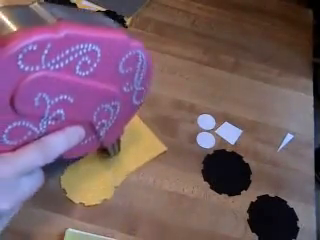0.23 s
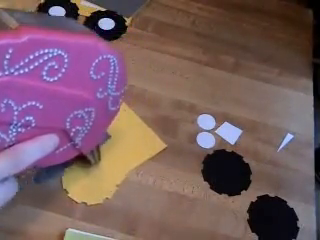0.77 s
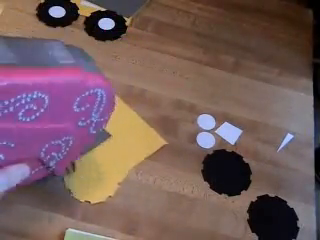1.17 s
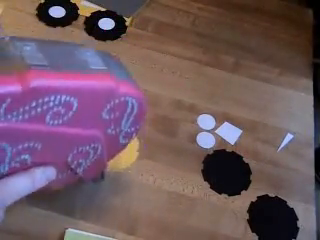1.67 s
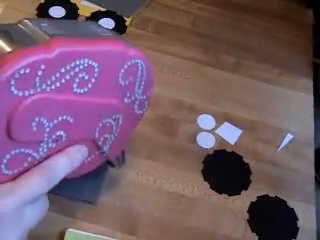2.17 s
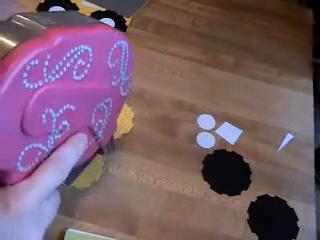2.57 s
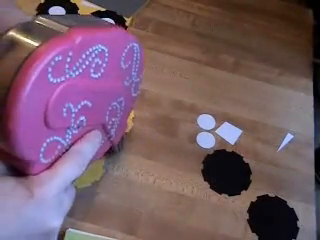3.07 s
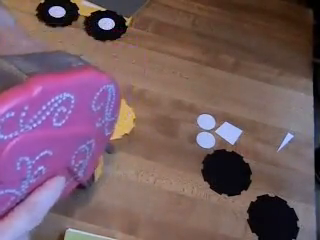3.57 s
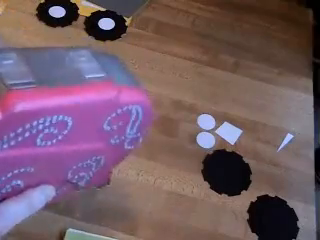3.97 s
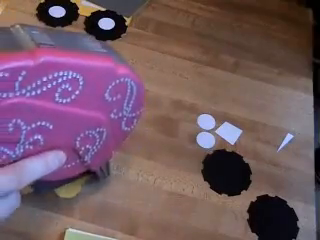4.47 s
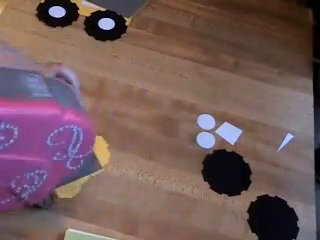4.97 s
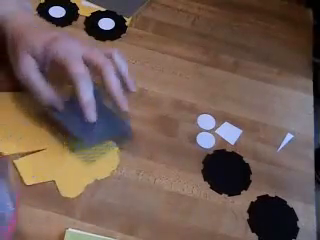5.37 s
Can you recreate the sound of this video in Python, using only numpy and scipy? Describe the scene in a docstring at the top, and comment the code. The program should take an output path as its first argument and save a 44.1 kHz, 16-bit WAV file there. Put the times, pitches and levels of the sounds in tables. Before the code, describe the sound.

A plastic tape runner clacks and rattles as it is pressed and dragged across cardstock on a wooden table.

```python
"""A big plastic tape runner, close to the microphone, on cardstock on a wooden table in a small room.
It is set on the card, dragged along it three times, then put down. Its hollow shell clacks at each
press and lift, and the reel gears rattle through it while it rolls. Sticky tape crackles as it parts,
the card slides, the table thuds under heavy presses. A faint mains hum lies behind it all."""
import sys
import numpy as np
from scipy import signal
from scipy.fft import rfft, irfft
from scipy.io import wavfile
from scipy.ndimage import uniform_filter1d

SR = 44100
rng = np.random.default_rng(int(sys.argv[2]) if len(sys.argv) > 2 else 0)


def write(x):
    x = np.atleast_2d(x).T
    wavfile.write(sys.argv[1], SR, np.round(np.clip(x, -1, 1) * 32767).astype(np.int16))


N = 247205
T = np.arange(N) / SR
FREQ = np.maximum(np.fft.rfftfreq(2 * N, 1 / SR), 1)
# Tone of the runner's growl, rolling or skidding. Each row: frequency in Hz, gain in dB.
GROWL_COLOUR = [(120, 2.5), (300, 3), (440, -7.5), (650, 0.5), (920, 2), (1500, 4), (2300, -8),
                (3200, -17.5), (6000, -42)]


def undb(db):
    """Decibels to gain."""
    return 10 ** (np.asarray(db) / 20)


def unit(x):
    """Scale to rms 1."""
    return x / np.sqrt(np.mean(x ** 2))


def fade(t, t60):
    """Exponential decay, 60 dB down after t60 seconds."""
    return np.exp(-np.log(1000) * t / t60)


def add(out, start_s, sound):
    """Mix a sound in at start_s."""
    i = int(start_s * SR)
    out[i:i + len(sound)] += sound[:N - i]


def colour(x, points):
    """Shape a sound by (Hz, dB) points."""
    hz, db = np.transpose(points)
    gain = undb(np.interp(np.log(FREQ), np.log(hz), db))
    return irfft(rfft(x, 2 * N) * gain)[:N]


def band(x, lo_hz, hi_hz, order=3):
    """Causal band-pass."""
    return signal.sosfilt(signal.butter(order, [lo_hz, hi_hz], 'band', fs=SR, output='sos'), x)


def wander(rate_hz):
    """Smooth random drift of rms 1."""
    hold = int(SR / rate_hz)
    steps = np.repeat(rng.standard_normal(N // hold + 2), hold)
    return unit(uniform_filter1d(steps, hold)[:N])


def grains(per_s, spread_db):
    """Random tiny snaps of uneven size."""
    snaps = (rng.random(N) < per_s / SR) * rng.choice([-1, 1], N)
    return unit(snaps * undb(spread_db * np.clip(rng.standard_normal(N), -2, 2)))


def swells(rows):
    """Gain that rises and falls exponentially around each peak."""
    return sum(undb(db) * np.exp(np.minimum((T - peak) / rise, (peak - T) / fall))
               for peak, rise, fall, db in rows)


def pushes(rows, edge_s, roundness=1.3):
    """A hand's effort: it takes hold within edge_s, grows to a peak, eases and lets go."""
    gain = np.zeros(N)
    for start, peak, end, db, sag_db in rows:
        from_peak = np.interp(T, [start, peak, end], [1, 0, 1])
        gain += undb(db - sag_db * from_peak ** roundness) * ((T > start) & (T < end))
    return np.abs(uniform_filter1d(gain, int(edge_s * SR)))


def room_tone(air_db=-46.6, waver_hz=0.61):
    """The room at rest: a wavering mains hum over a soft rush of air."""
    # Tones of the hum. Each row: frequency in Hz, rms level in dB.
    hum_tones = [(75.4, -66), (118.4, -51.5), (183.0, -57.5)]
    # Tone of the air. Each row: frequency in Hz, gain in dB.
    air_colour = [(15, -56), (25, -12), (122, -7), (148, -14), (188, 1.5), (228, -12.5), (270, -11.5),
                  (426, -15.5), (504, -21.5), (555, -13.5), (796, -17.5), (1890, -20.5), (2080, -23),
                  (5570, -32), (7800, -35), (10100, -51.5), (17200, -120)]
    hum = np.zeros(N)
    for hz, db in hum_tones:
        amplitude = np.sqrt(2) * undb(db + 0.31 * wander(6.6))
        cycles = np.cumsum(hz + waver_hz * wander(10)) / SR
        hum += amplitude * np.sin(2 * np.pi * cycles)
    drift = undb(.7 * wander(4.2))
    air = unit(colour(rng.standard_normal(N), air_colour))
    return hum + air * undb(air_db) * drift


def shell(x, direct):
    """The hollow case adds its resonances to the direct sound."""
    # Resonances of the case. Each row: frequency in Hz, width in Hz, gain in dB.
    resonances = [(409.3, 29, 1), (533.4, 11.7, 9), (572, 6.8, -0.5), (664.8, 38.4, 13), (723.3, 40, 9),
                  (866, 11, -2), (1023.5, 49, -6), (1272, 117, -5), (1482, 76, -10.5), (1630, 190, -10.5),
                  (1860, 210, -7.5), (2400, 720, -2), (2848, 300, -2.5), (4430, 2200, -7),
                  (5740, 40, -29.5)]
    return direct * x + sum(undb(db) * signal.lfilter(*signal.iirpeak(hz, hz / width, fs=SR), x)
                            for hz, width, db in resonances)


def clacks(snap=7, build_s=0.001304, crack_t60=0.047, tail_t60=0.25, tail_db=-17.0, contact_slope=6.25):
    """Each blow snaps the shell and its plastic parts chatter; a soft contact dulls the high ranges."""
    # Blows on the shell. Each row: start in seconds, level in dB, contact corner in Hz
    # (high for a hard edge, low for a blow padded by card).
    blows = [(0.036, -41.5, 3000), (0.0745, -28, 1100), (0.5998, -17, 1830), (0.714, -28.5, 2200),
             (0.7367, -25.5, 1790), (0.8066, -20.5, 2250), (0.831, -22, 1195), (0.9177, -21.5, 1260),
             (0.9904, -23.5, 1780), (1.046, -18.5, 1660), (1.1379, -33.5, 2400), (1.2482, -19.5, 2670),
             (1.2735, -20.5, 2000), (1.3009, -32.5, 4860), (1.3222, -33, 3420), (1.3478, -29, 3450),
             (1.3637, -34, 5500), (1.475, -27.5, 3370), (1.5042, -25, 2000), (1.7489, -32, 3530),
             (2.3348, -23.5, 2120), (2.761, -47.5, 4900), (3.0873, -21, 2254), (3.1318, -29.5, 1300),
             (3.175, -25.5, 3320), (3.2354, -24, 2400), (3.3662, -32.5, 1560), (3.4008, -38.5, 2600),
             (3.431, -32.5, 1870), (3.4453, -23.5, 2470), (3.481, -29.5, 2000), (3.675, -30.5, 1820),
             (3.819, -25, 2780), (3.8374, -33.5, 2000), (3.8627, -44, 4000), (3.925, -37, 4200),
             (3.9553, -24, 3600), (4.081, -21.5, 1850), (4.6614, -14, 1440), (4.6823, -18.5, 2070),
             (4.923, -29.5, 3070), (5.052, -35.5, 1710), (5.1043, -23.5, 2503), (5.2189, -29, 4000),
             (5.5792, -4, 2160)]
    # Ranges in which the shell answers, from thump to edge tick.
    # Each row: lower and upper edge in Hz, gain in dB, relative ring time.
    ranges = [(60, 303, -20.5, 1.8), (416, 896, -9, 0.82), (894, 1816, -8, 1.08), (2000, 4150, -2.5, 0.82),
              (4000, 8500, 8, 0.66)]
    out, t = np.zeros(N), T[:SR // 4]
    since_peak = np.maximum(t - build_s, 0)
    tail = undb(tail_db) * fade(since_peak, tail_t60)
    for start, db, corner_hz in blows:
        chatter = rng.standard_normal(len(t)) * np.minimum(t / build_s, 1)
        for lo_hz, hi_hz, range_db, hold in ranges:
            push = chatter * (fade(since_peak, crack_t60 * hold) + tail)
            push[int(build_s * SR)] += snap  # the parts seat home as the push peaks
            ring = band(shell(push, direct=0.21), lo_hz, hi_hz)
            ring /= np.std(ring[:SR // 60])  # the attack sets the level
            centre_hz = np.sqrt(lo_hz * hi_hz)
            contact = 1 / np.sqrt(1 + (centre_hz / corner_hz) ** contact_slope)
            add(out, start, ring * contact * undb(db + range_db))
    return out


def reel(tooth_hz=85, catch_decay_teeth=0.35, tick_db=-13.5, tick_growth=0.29):
    """Gear teeth catch unevenly, faster and brighter when pushed; each sprays snaps into the shell."""
    # Three drags and one brief nudge of the reel.
    # Each row: start, hardest moment and end in seconds, level in dB, sag at both ends in dB.
    strokes = [(0.7, 0.96, 1.203, -31, 13.5), (3.44, 3.62, 3.755, -31, 9), (4.2, 4.222, 4.255, -35, 15),
               (4.76, 4.94, 5.06, -24.5, 15)]
    force = pushes(strokes, edge_s=.02)
    effort = force / force.max()
    unevenness = np.exp(.35 * wander(60))
    teeth_passed = np.cumsum(tooth_hz * (.5 + 0.49 * np.sqrt(effort)) * unevenness) / SR
    kick = rng.random(N // 100)[teeth_passed.astype(int)] ** 2  # a few teeth catch much harder
    catch = 1 + 2.0 * kick * np.exp(-(teeth_passed % 1) / catch_decay_teeth)  # steady rub plus kicks
    rattle = shell(grains(7000, spread_db=3) * catch, direct=0.34)
    growl = unit(colour(rattle, GROWL_COLOUR))
    ticks = unit(band(rattle, 2690, 7430, order=2)) * undb(tick_db) * effort ** tick_growth
    return force * (growl + ticks)


def pings(t60=0.04, upper_ratio=1.069):
    """On some clacks the guide and pawl ring briefly in a close pair of modes."""
    # Rings of the small plastic parts. Each row: start in seconds, lower mode in Hz, level in dB.
    rings = [(0.738, 2430, -22), (0.808, 1655, -15), (1.136, 4050, -29.5), (1.138, 1744, -26.5),
             (2.337, 1810, -21.5), (3.131, 2400, -32.5), (3.237, 1830, -24.5), (3.446, 2425, -21.5),
             (5.106, 2110, -24.5)]
    out, t = np.zeros(N), T[:SR // 8]
    for start, hz, db in rings:
        lower = np.sin(2 * np.pi * hz * t)
        upper = .5 * np.sin(2 * np.pi * hz * upper_ratio * t + rng.uniform(0, 2 * np.pi))
        add(out, start, undb(db) * (lower + upper) * fade(t, t60))
    return out


def skids():
    """The tip sticks and slips as it bites or lets go, and croaks through the shell."""
    # Skids of the tip. Each row: peak time, rise and fall in seconds, level in dB.
    tip_skids = [(0.809, 0.0081, 0.0018, -25.5), (0.921, 0.004, 0.0064, -25),
                 (1.276, 0.0029, 0.0035, -24.5), (3.091, 0.0042, 0.0036, -14), (3.449, 0.011, 0.019, -28.5),
                 (4.686, 0.0071, 0.001, -27)]
    croak = shell(grains(7300, spread_db=2), direct=0.17)
    return swells(tip_skids) * unit(colour(croak, GROWL_COLOUR))


def tape(snaps_per_s=2500):
    """Threads of glue stretch and snap in a short bright crackle."""
    # Tape parting from the card. Each row: peak time, rise and fall in seconds, level in dB.
    peels = [(1.355, 0.011, 0.012, -22), (3.955, 0.012, 0.01, -23.5), (3.99, 0.0054, 0.0068, -30.5),
             (5.189, 0.014, 0.043, -31), (5.22, 0.014, 0.0038, -31)]
    # Tone of the crackle. Each row: frequency in Hz, gain in dB.
    peel_colour = [(200, -5.5), (700, -1), (1600, -2), (3000, -3), (5500, -2.5), (7500, -7.5)]
    crackle = grains(snaps_per_s, spread_db=6) + .6 * rng.standard_normal(N)
    return swells(peels) * unit(colour(crackle, peel_colour))


def card(gain_db=2.5):
    """Paper fibres catch and slip in a soft, dry hiss."""
    # Card sliding under tool and fingers. Each row: start, turning point and end in seconds,
    # relative level in dB, sag at both ends in dB (negative makes the ends louder).
    slides = [(1.37, 1.48, 1.69, -46.5, 12.5), (1.77, 1.88, 1.99, -46, 3.5), (2.1, 2.22, 2.287, -47, 12),
              (2.36, 2.44, 2.57, -48, 36), (2.55, 2.61, 2.7, -55.5, -7), (3.17, 3.185, 3.3, -55, 9),
              (3.97, 4.14, 4.22, -46, 12), (5.23, 5.35, 5.62, -45, 25)]
    # Tone of the hiss. Each row: frequency in Hz, gain in dB.
    card_colour = [(200, -18), (600, 0), (1000, -3.5), (1700, -2), (2800, -2), (5000, 0.5), (7500, -3)]
    fibres = grains(9000, spread_db=4) * undb(.8 * wander(70))
    return unit(colour(fibres, card_colour)) * pushes(slides, edge_s=0.038) * undb(gain_db)


def table_thuds(detune=0.021):
    """The table top answers heavy presses with a dull thud; broad pushes also move its lowest mode."""
    # Presses that rock the top. Each row: start in seconds, level in dB, lowest mode's extra gain in dB.
    presses = [(1.478, -40.5, -11), (1.753, -28.5, -24), (3.08, -32, 16.5), (3.177, -35, -18),
               (3.455, -29.5, -22), (3.483, -30, -20), (4.081, -48, -24), (4.664, -17, -32),
               (4.686, -21.5, -14), (4.742, -27, -34), (5.582, -19.5, -19)]
    # Modes of the wooden top. Each row: frequency in Hz, gain in dB, time to fall 60 dB in seconds.
    modes = [(54.6, -14.5, 0.093), (101, -11.5, 0.064), (167.8, 0, 0.18), (204.7, -1.5, 0.2),
             (371, -12, 0.14)]
    out, t = np.zeros(N), T[:SR // 2]
    for start, db, lowest_db in presses:
        for k, (hz, mode_db, t60) in enumerate(modes):
            ring_hz = hz * (1 + detune * rng.standard_normal())
            ring = np.sin(2 * np.pi * ring_hz * t) * fade(t, t60)
            add(out, start, ring * undb(db + mode_db + lowest_db * (k == 0)))
    return out


def reflections(x, t60, gap_s):
    """A dense, decaying cloud of echoes reaches the microphone gap_s after the direct sound."""
    t = T[:SR // 2]
    echoes = rng.standard_normal(len(t)) * fade(t, t60) * (t > gap_s)
    return signal.fftconvolve(x, echoes / np.linalg.norm(echoes))[:N]


def scene(room_db=-19, pan_db=-0.14, draught_db=-65):
    """Tool and table in a small room, close to a stereo microphone and a hair right of centre."""
    # Stereo width. Each row: frequency in Hz, side level relative to mid in dB.
    width = [(60, -30), (150, -30), (300, -7), (600, -11), (1300, -3), (2700, -7.5), (3500, 1), (4400, -37)]
    near = clacks() + skids() + pings() + table_thuds() + reel() + card() + tape()
    mid = near + undb(room_db) * reflections(near, t60=0.3, gap_s=0.0034) + room_tone()
    # table top and tool throw back early echoes that differ between left and right
    side = colour(reflections(mid, t60=0.02, gap_s=0.00021), width)
    side += undb(draught_db) * unit(band(rng.standard_normal(N), 20, 100))  # air at the microphone ports
    return np.array([(mid + side) * undb(pan_db / 2), (mid - side) * undb(-pan_db / 2)])


def record(dry):
    """A small camera microphone: the loudest peaks are rounded, the deep bass and the top are cut."""
    ceiling, bass_hz, soften_hz, top_hz = .85, 30, 7600, 7850
    rounded = ceiling * np.tanh(dry / ceiling)
    thinned = signal.sosfilt(signal.butter(2, bass_hz, 'high', fs=SR, output='sos'), rounded)
    softened = signal.sosfilt(signal.butter(16, soften_hz, fs=SR, output='sos'), thinned)
    return signal.sosfilt(signal.ellip(10, .3, 70, top_hz, fs=SR, output='sos'), softened)


dry = scene()
out = record(dry)
write(out)
```